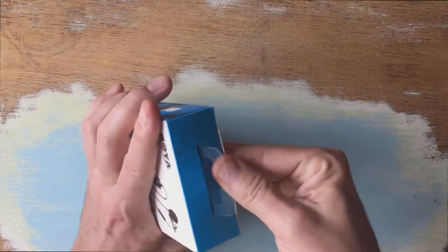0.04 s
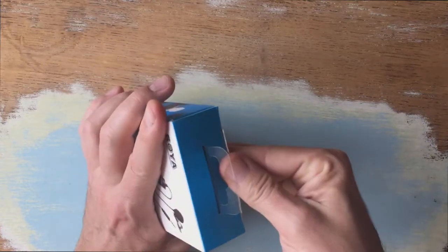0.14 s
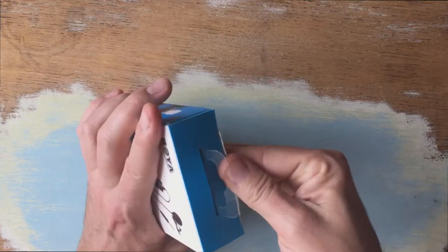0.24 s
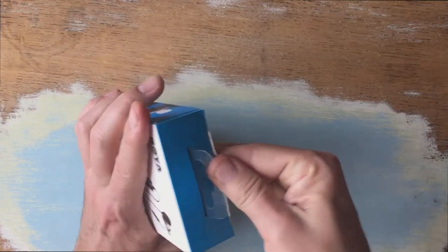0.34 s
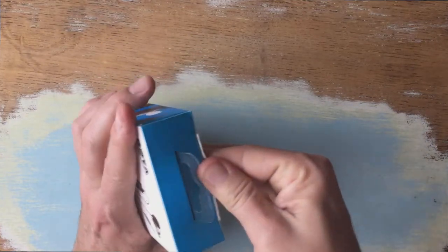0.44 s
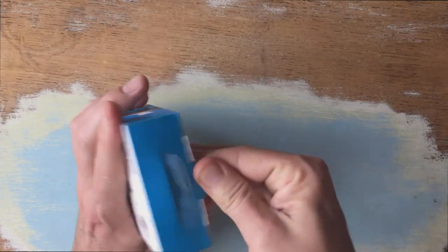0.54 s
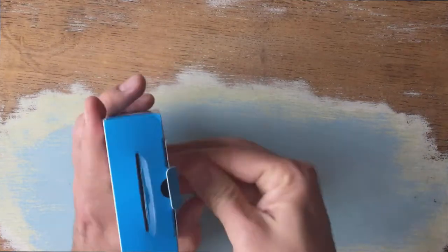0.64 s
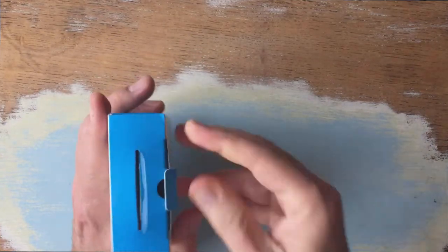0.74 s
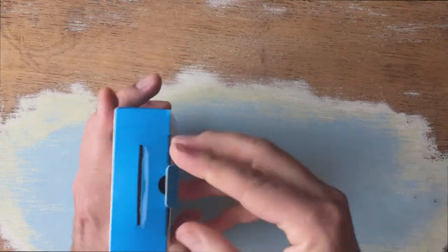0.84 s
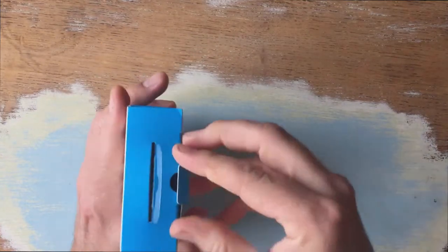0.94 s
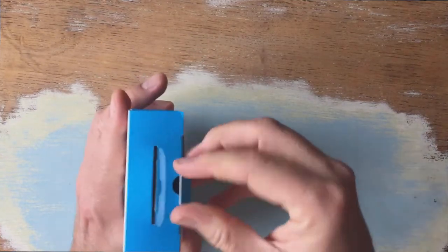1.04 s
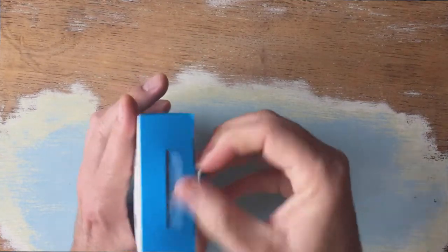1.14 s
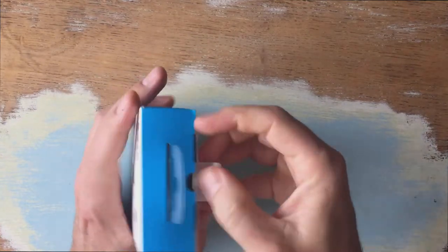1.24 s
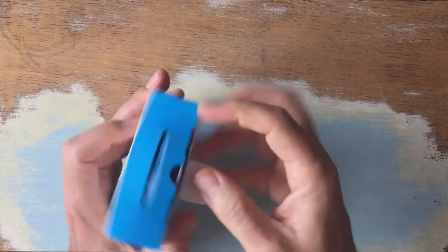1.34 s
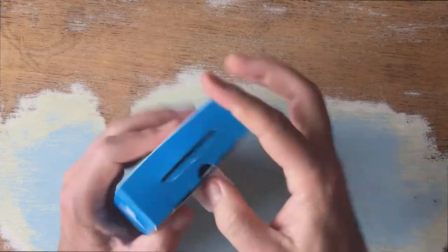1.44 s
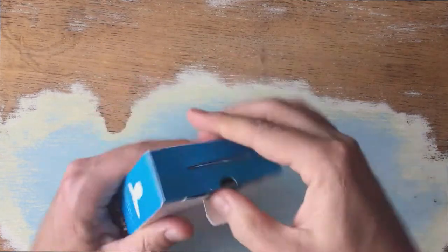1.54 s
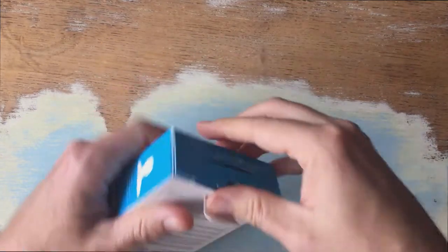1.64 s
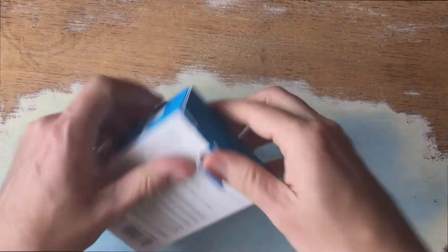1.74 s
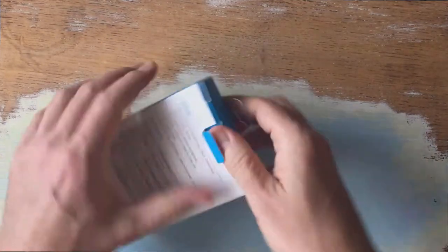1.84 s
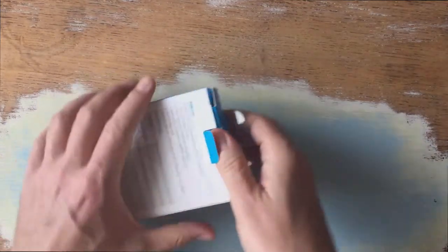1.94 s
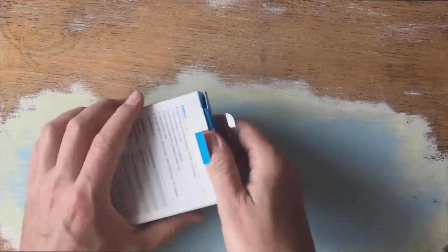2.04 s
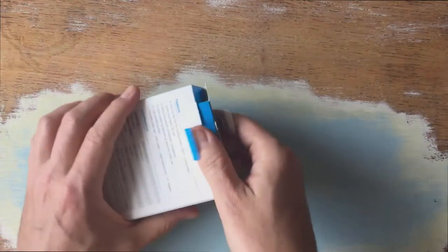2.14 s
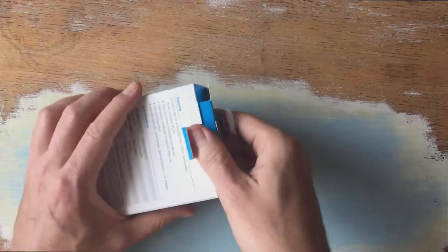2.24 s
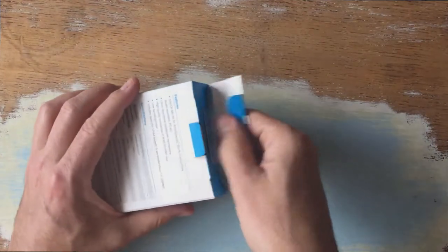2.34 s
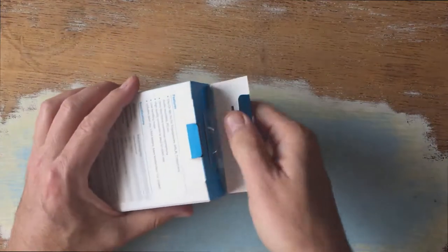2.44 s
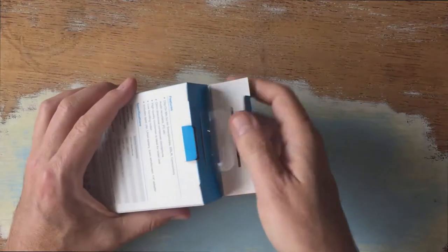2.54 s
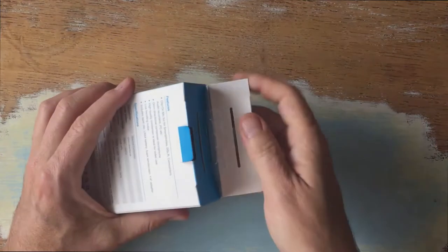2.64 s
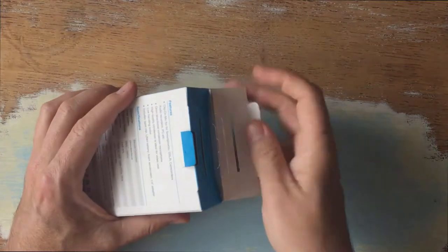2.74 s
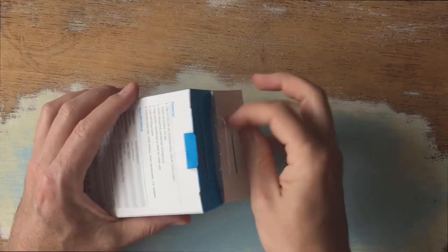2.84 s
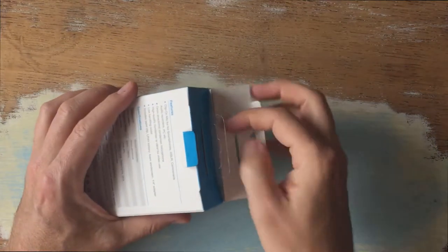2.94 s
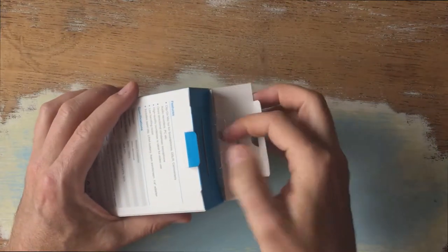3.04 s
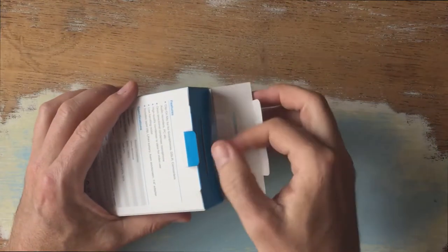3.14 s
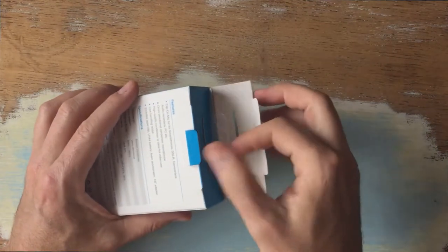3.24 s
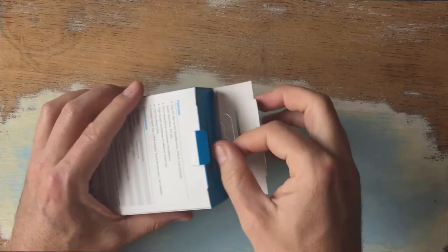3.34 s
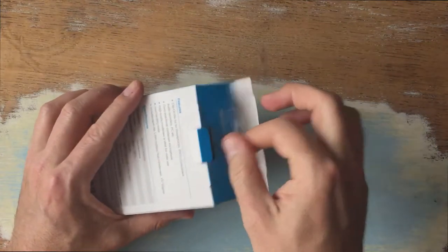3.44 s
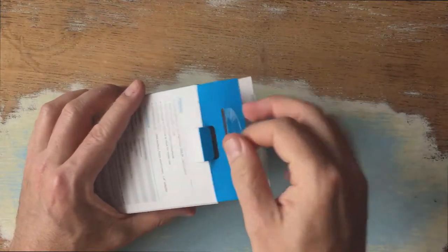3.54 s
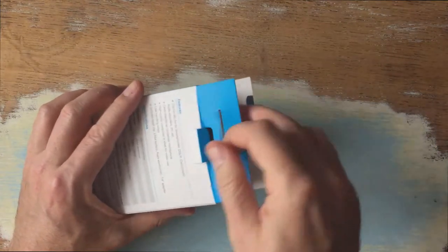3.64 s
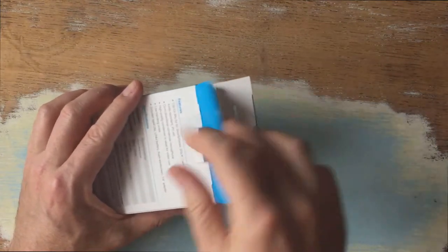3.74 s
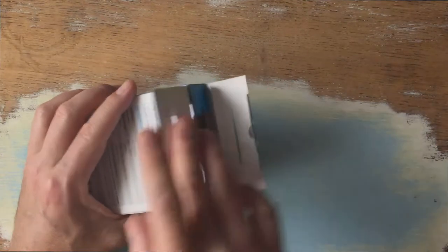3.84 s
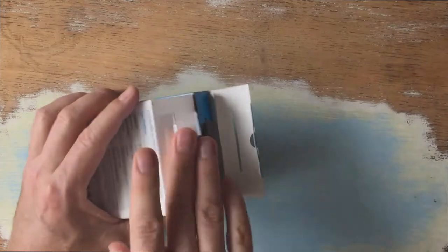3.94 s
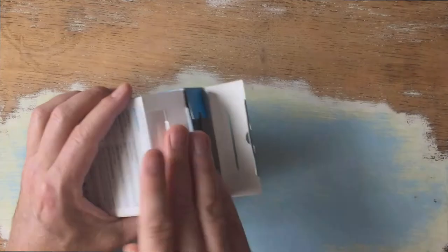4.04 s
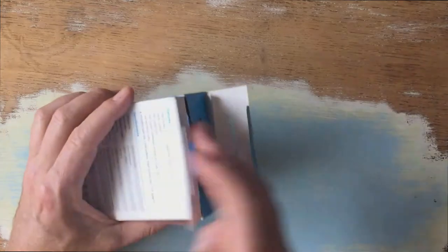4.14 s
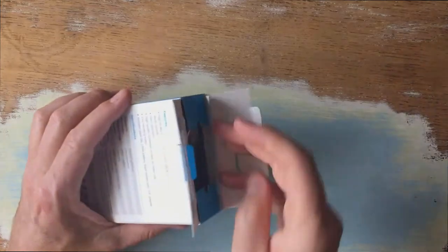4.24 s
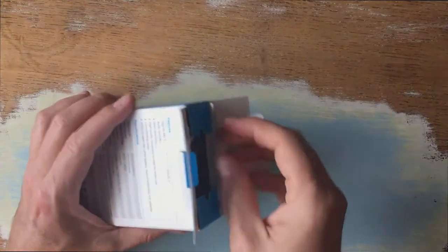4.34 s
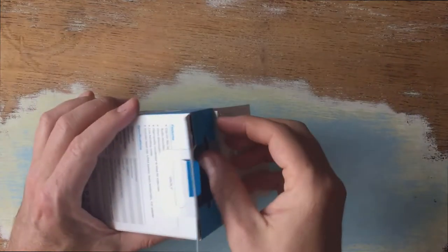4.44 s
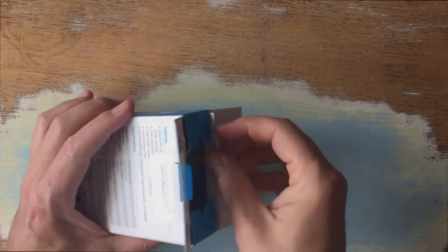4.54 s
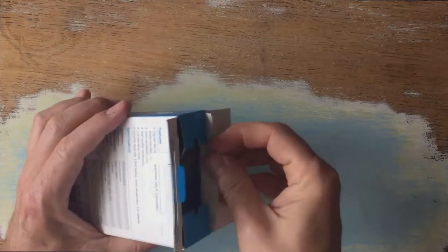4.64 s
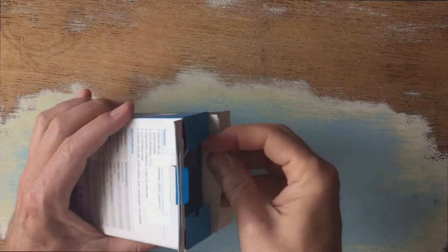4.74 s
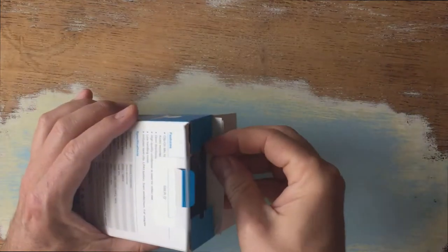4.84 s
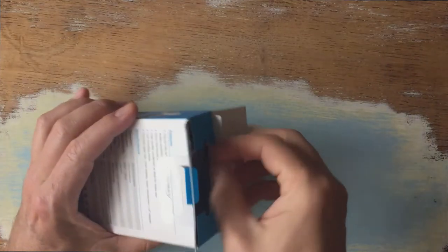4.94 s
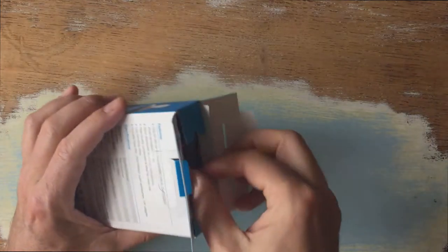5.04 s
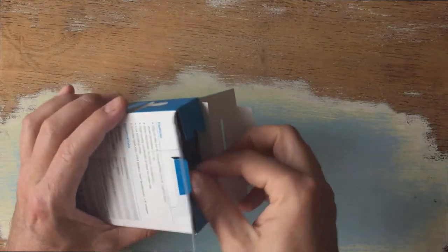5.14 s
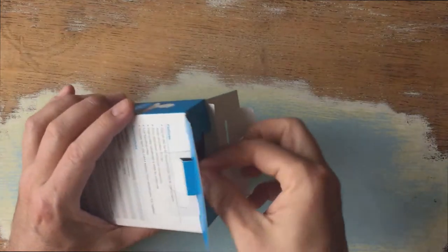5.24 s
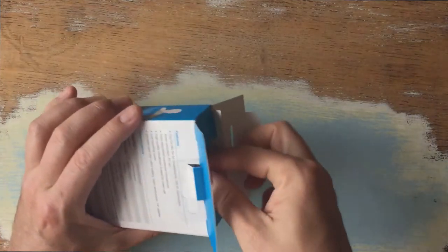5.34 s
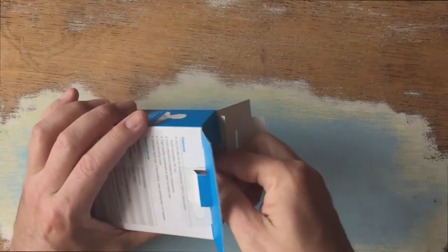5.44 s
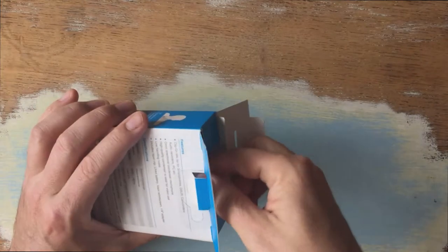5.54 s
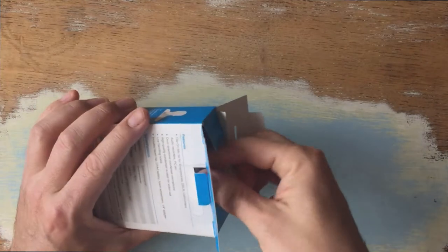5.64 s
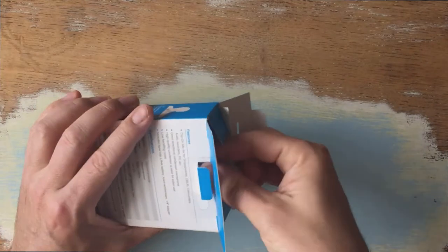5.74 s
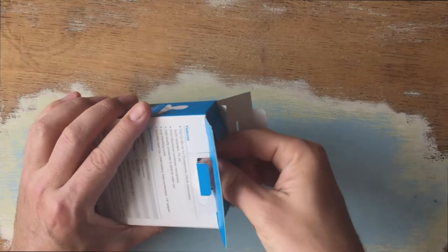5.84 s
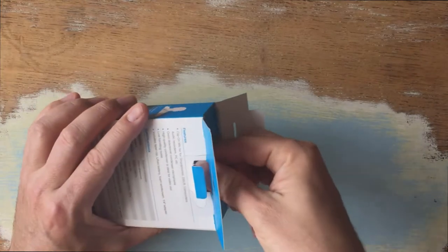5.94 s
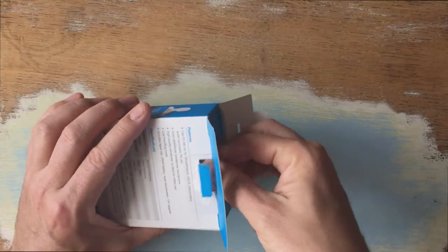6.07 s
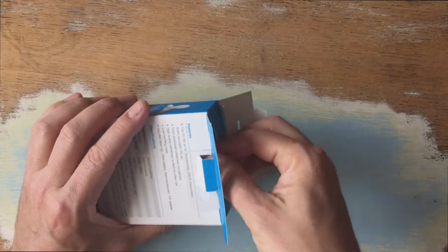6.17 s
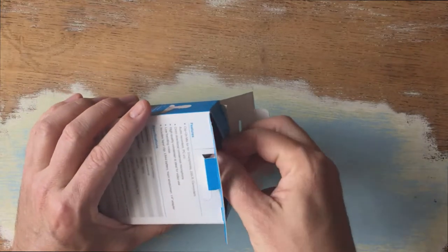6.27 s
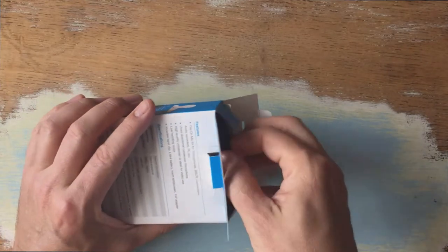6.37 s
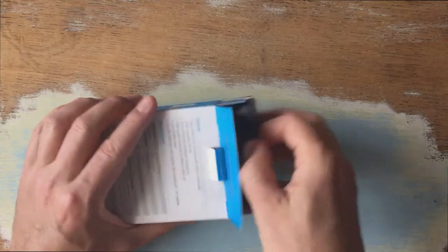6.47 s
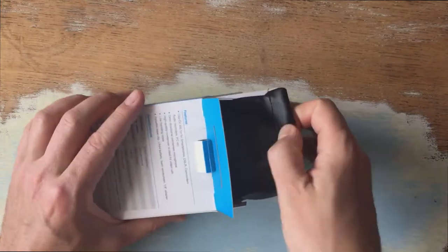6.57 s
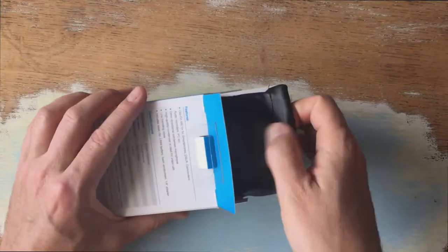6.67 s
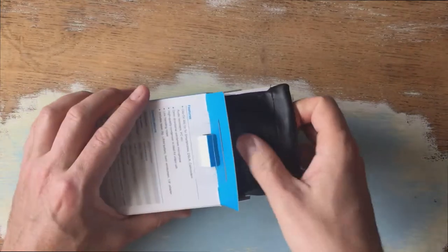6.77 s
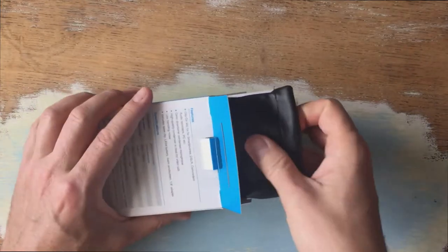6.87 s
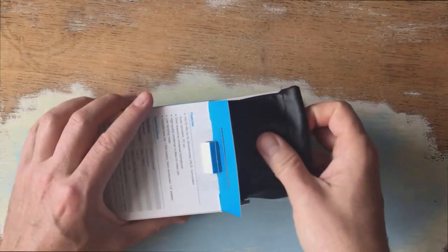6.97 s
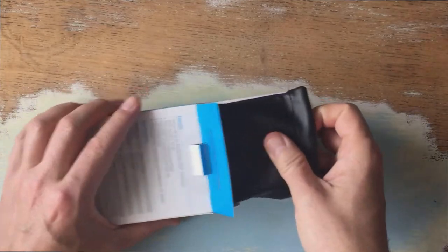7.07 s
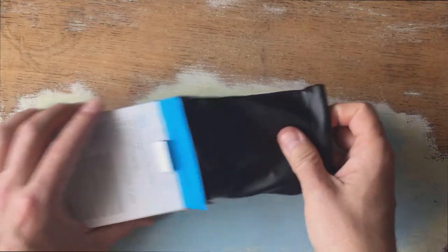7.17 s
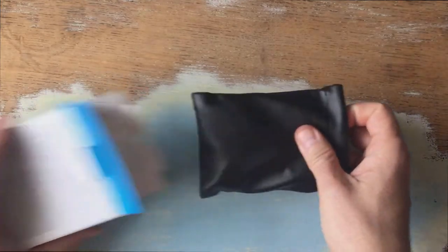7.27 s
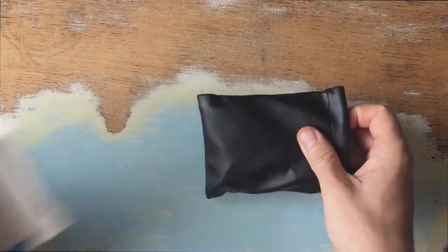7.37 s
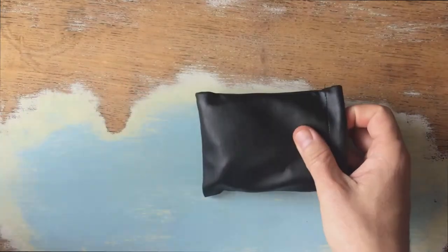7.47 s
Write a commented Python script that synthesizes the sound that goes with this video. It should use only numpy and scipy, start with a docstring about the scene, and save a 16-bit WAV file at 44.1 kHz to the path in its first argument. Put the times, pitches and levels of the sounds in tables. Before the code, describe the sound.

A close microphone in a quiet, barely reverberant room, with faint low hum and soft air tone. At 0 s hands lightly rub a small cardboard box while a low table ring fades; small ticks follow. At 0.68 s a bright, sharp snap with a hollow tap stands out, then near quiet. Around 1.36 s crisp clicks lead to a heavy, low wooden thud at 1.5 s, quickly muted, with further bumps and a brief ring to 1.85 s. From 2.0 to 2.7 s come boxy knocks, a short creak and dense flap snaps and scrapes. Lighter clicks continue until the loudest crack at 3.57 s, then scuffs and taps to 4.3 s. Quieter papery fiddling runs to 6.4 s, busier with ticks and little creaks near 5.5-5.8 s. At 6.5 s a hollow bump and long dry drag begin the pouch's removal; sliding and clustered taps at 7.2-7.4 s end it.

```python
"""In a quiet room, over faint hum and room tone, hands rub a small cardboard box; a panel sings and the low
ring of a table knock fades. Noise bursts snap from card edges; decaying modes thud in the table top and tap in
the hollow box. A sharp snap comes at 0.68 s; a heavy thud at 1.5 s is muted by a grip, then while the box is
lifted the table rings on until it lands. Noise slides join from 2 s as flaps and pouch drag over card; the
loudest snap comes near 3.6 s, quieter handling follows, and stronger taps and long drags of the pouch close the
scene."""
import sys
import numpy as np
from scipy import signal
from scipy.fft import rfft, irfft, next_fast_len
from scipy.io import wavfile

SR = 44100
rng = np.random.default_rng(int(sys.argv[2]) if len(sys.argv) > 2 else 0)


def gain_from_decibels(decibels):
    """Convert decibel values to linear amplitude factors."""
    exponent = np.asarray(decibels, float) / 20
    return 10 ** exponent


def transcribe(signal):
    """Save signal, clipped to [-1, 1], as a 16-bit WAV file at the path in sys.argv[1]."""
    frames = np.atleast_2d(signal).T
    limited = np.clip(frames, -1, 1)
    pcm = np.round(limited * 32767).astype(np.int16)
    wavfile.write(sys.argv[1], SR, pcm)


N = 331191


def rms_one(x):
    """Normalisation: scales a signal to unit rms."""
    return x / np.sqrt(np.mean(x ** 2) + 1e-20)


def cut(x, hz, kind, order=2):
    """Maximally flat filtering: a Butterworth filter."""
    return signal.sosfilt(signal.butter(order, hz, kind, fs=SR, output="sos"), x)


def resonance(x, hz, width_hz):
    """Damped oscillator: a two-pole peak with gain near 1 on top."""
    r = np.exp(-np.pi * width_hz / SR)
    feedback = [1, -2 * r * np.cos(2 * np.pi * hz / SR), r * r]
    return signal.lfilter(np.array([1, 0, -1]) * (1 - r * r) / 2, feedback, x)


def coloured(x, spectrum):
    """Spectral shaping: weights the Fourier components of white noise."""
    hz, level_db = np.transpose(spectrum)
    size = next_fast_len(len(x))
    grid = np.maximum(np.fft.rfftfreq(size, 1 / SR), 1)
    gain = gain_from_decibels(np.interp(np.log(grid), np.log(hz), level_db))
    return irfft(rfft(x, size) * gain, size)[:len(x)]


def drift(rate_hz):
    """Low-pass random modulation: unit-rms noise below rate_hz, drawn at every 20th sample."""
    slow = cut(rng.standard_normal(N // 20 + 3002), 20 * rate_hz, "low")[3000:]
    return np.interp(np.arange(N) / 20, np.arange(len(slow)), rms_one(slow))


def add(out, s, sound):
    """Superposition: mixes a short sound in at time s."""
    i = int(s * SR)
    out[i:i + len(sound)] += sound[:N - i]


# early rough hum: time_s, level_db (rms)
EARLY_HUM = [(0, -54.5), (.6, -71), (1.35, -66), (1.6, -81.5)]
# deep rumble that comes and goes: time_s, level_db (rms)
RUMBLE_LEVEL = [(0.0, -79), (1.21, -81), (1.59, -78), (1.88, -76), (3.86, -71.5), (3.93, -80.5),
                (6.77, -76), (6.89, -67), (7.5, -82.5)]


def hum():
    """Narrow-band noise: an early rough hum, a steady lower one and a deep wavering rumble."""
    def level(rows):
        return gain_from_decibels(np.interp(np.arange(N) / SR, *np.transpose(rows)))
    early = level(EARLY_HUM) * rms_one(resonance(rng.standard_normal(N), 200.0, 30.))
    deep = level(RUMBLE_LEVEL) * rms_one(cut(rng.standard_normal(N), [38., 75.], "band"))
    steady = gain_from_decibels(-82.0) * rms_one(resonance(rng.standard_normal(N), 95., 35.))
    return early + deep + steady


# spectrum of the room tone: pitch_hz, level_db (relative)
AIR_SPECTRUM = [(45, -8), (75, 8.5), (108, 16.5), (229, 12.5), (373, -5), (641, 0), (840, -25), (1290, -19),
                (4500, -7), (9070, -6.5), (13600, -37.5), (16000, -60)]


def room_tone():
    """Stationary coloured noise: the steady air of the room."""
    air_db = -71
    return gain_from_decibels(air_db) * rms_one(coloured(rng.standard_normal(N), AIR_SPECTRUM))


def crackle():
    """Impulse excitation: random fibre cracks ring a few cycles, each pitch in patches of its own."""
    cracks_per_s = 420   # before clumping
    born = rng.random(N) < cracks_per_s * gain_from_decibels(3.0 * drift(12)) / SR
    sizes = gain_from_decibels(4 * np.minimum(rng.exponential(1, N), 3)) * rng.choice([-1, 1], N) * born
    pitches_hz, dealt = np.geomspace(550.0, 3200.0, num=9), rng.integers(0, 9, N)
    rings = np.zeros(N)
    for k, hz in enumerate(pitches_hz):
        cracks = gain_from_decibels(4 * drift(12)) * sizes * (dealt == k) + 1e-18
        rings += rms_one(resonance(cracks, hz, 0.08 * hz))
    return rms_one(cut(rings, 2600.0, "low"))


# walls and air of the box: pitch_hz, level_db (relative), t60_s (before the ring factors)
BOX_MODES = [(501, 10.5, 0.065), (600, 16.5, 0.064), (660, 9, 0.14), (750, 6, 0.13), (847.6, 12, 0.089),
             (910, 3, 0.22), (1001, 7.5, 0.14), (1140, -4.5, 0.38), (1210, 13, 0.093), (1310, 10.5, 0.1),
             (1460, 12, 0.19), (1600, 7, 0.18)]
# modes of the table top: pitch_hz, level_db (relative), t60_s (before the ring factors)
TABLE_MODES = [(72, -13, 0.12), (102, -11, 0.24), (147.7, 4, 0.34), (201.6, -14, 0.16), (229.3, -2, 0.14),
               (258.1, -2.5, 0.14), (279.8, -2.5, 0.083), (322, -7.5, 0.097), (438.8, -12.5, 0.14)]
# colour of skin rubbing card: pitch_hz, level_db (per Hz, relative)
HISS_SPECTRUM = [(710, 5.5), (1200, -18), (1750, 0.5), (2060, 20), (2270, 5), (4600, -19.5), (6160, -26.5),
                 (11600, -29.5), (16000, -36)]
# hands at work: time_s, slide_db (skin on card), shift_db (box on table), both before layer offsets
RUB_LEVEL = [(0.0, -60, -44), (0.33, -66, -76), (0.45, -66, -64), (0.6, -74, -72), (1.051, -71, -84),
             (1.291, -55, -78), (1.458, -57.5, -59), (1.659, -54.5, -52), (1.81, -72, -73),
             (1.954, -62.5, -47.5), (2.38, -54, -58), (2.82, -75.5, -82), (3.16, -66.5, -64.5),
             (3.37, -69.5, -63), (3.47, -49.5, -67), (3.79, -56, -64), (4.05, -51, -65.5),
             (4.115, -63, -63), (4.251, -58, -66.5), (4.349, -68, -67), (4.87, -66, -73),
             (5.63, -60, -60.5), (5.98, -63.5, -62.5), (6.459, -51.5, -63.5), (6.759, -64.5, -74),
             (7.26, -48.5, -74), (7.51, -71.5, -64)]

SPLIT_HZ = 6000   # between body and treble of the card sounds


def rubbing():
    """Stick-slip friction: clumped grains of uneven size that also keep box and table humming."""
    hiss_db, box_hum_db, table_hum_db, crackle_db = -18, -11.5, -2.5, -6.5   # layers against control
    treble_offset_db, treble_follows = -10, 0.46   # treble moves by this share of the slide level
    s, *controls = np.transpose(RUB_LEVEL)
    slide_db, shift_db = [np.interp(np.arange(N) / SR, s, c) for c in controls]
    mean_db = slide_db.mean()
    treble_db = treble_offset_db + mean_db + treble_follows * (slide_db - mean_db)

    sizes = gain_from_decibels(0.98 * np.minimum(rng.exponential(1, N), 5)) * rng.standard_normal(N)
    sparse = sizes * (rng.random(N) < 9000 / SR)   # 9000 grains per second
    grains = sparse + 1.9 * rng.standard_normal(N)
    clumps = gain_from_decibels(3 * drift(14) + 2 * drift(70))
    flutter_db = 3.5 * drift(20)

    hiss = coloured(grains, HISS_SPECTRUM)
    mid = rms_one(cut(hiss, SPLIT_HZ, "low", order=4))
    top = rms_one(cut(hiss, SPLIT_HZ, "high", order=4))
    box = rms_one(sum(gain_from_decibels(db) * resonance(grains, hz, 64.0) for hz, db, t60 in BOX_MODES))
    table = rms_one(sum(gain_from_decibels(db) * resonance(grains, hz, 37.0) for hz, db, t60 in TABLE_MODES))

    surface = gain_from_decibels(hiss_db) * mid + gain_from_decibels(box_hum_db + flutter_db) * box + gain_from_decibels(crackle_db) * crackle()
    sliding = clumps * gain_from_decibels(slide_db) * surface
    treble = np.sqrt(clumps) * gain_from_decibels(treble_db) * top   # clumps less than the body
    return sliding + treble + gain_from_decibels(shift_db + table_hum_db) * table


# singing box walls; the low opening row is the fading ring of a table knock:
# start_s, end_s, level_db (at the start), first_hz, last_hz
CREAK_EVENTS = [(0.0, 0.229, -57.5, 1572, 1600), (0.0, 0.132, -52.5, 248, 269),
                (1.24, 1.345, -57, 1500, 1500), (1.619, 1.685, -50, 750, 726),
                (1.612, 1.68, -50, 1023, 993), (1.995, 2.085, -59, 1620, 1600),
                (2.106, 2.143, -39, 875, 835), (2.516, 2.615, -53.5, 785, 832),
                (2.78, 2.81, -62, 3650, 3640), (2.873, 2.93, -59.5, 3470, 3480),
                (2.875, 2.931, -64, 1244, 1280), (3.021, 3.055, -51.5, 1288, 1250),
                (4.94, 4.966, -56.5, 1680, 1723), (5.04, 5.062, -60, 517, 520),
                (5.42, 5.476, -57, 646, 660), (4.13, 4.174, -48.5, 760, 750), (4.202, 4.303, -52, 700, 587),
                (5.616, 5.658, -49, 660, 606), (5.68, 5.734, -46.5, 548, 652),
                (5.675, 5.72, -50.5, 1205, 1190), (5.73, 5.772, -42, 1600, 1750),
                (5.726, 5.788, -45.5, 2325, 2466), (5.859, 5.885, -50, 1490, 1450),
                (7.12, 7.24, -58, 683, 636), (7.272, 7.33, -45, 660, 705), (7.365, 7.439, -50.5, 880, 880),
                (7.37, 7.407, -47, 2860, 2820)]


def creaks():
    """Narrow-band excitation: uneven slips feed one band of gliding pitch; a pressed wall bends its pitch."""
    width_share, fade_db, slips_per_s = 0.064, -7, 900   # half width as a share of pitch; fade to the end
    out, lead = np.zeros(N), 500   # samples for the filter to settle
    for start_s, end_s, level_db, first_hz, last_hz in CREAK_EVENTS:
        along = np.linspace(0, 1, int((end_s - start_s) * SR))
        count = len(along) + lead
        slips = rng.standard_normal((2, count)) * (.05 + (rng.random(count) < slips_per_s / SR))
        swing = cut(slips, width_share * first_hz, "low")[:, lead:]
        phase = 2 * np.pi * np.cumsum(first_hz + (last_hz - first_hz) * along) / SR
        tone = rms_one(swing[0] * np.sin(phase) + swing[1] * np.cos(phase))
        edges = np.clip(np.minimum(along, 1 - along) * 8, 0, 1)
        add(out, start_s, gain_from_decibels(level_db + fade_db * along) * edges * tone)
    return out


def card(noise, strongest_hz, width_hz, treble_db):
    """Source-filter principle: slip noise through a broad peak, panel rings and treble near 9 kHz."""
    body = resonance(noise[0], strongest_hz, width_hz) + 0.096 * cut(noise[0], [1500, SPLIT_HZ], "band")
    octaves = rng.normal(.2, .6, 3)
    rings_hz = np.clip(strongest_hz * 2 ** octaves, 900, 9000)
    body += 0.3 * sum(resonance(noise[0], hz, 0.05 * hz) for hz in rings_hz)

    fizz = gain_from_decibels(rng.normal(-11, 3)) * cut(noise[1], [10500, 15000], "band")
    treble = resonance(noise[1], 8800., 2100.0) + fizz
    treble_rings_hz = SPLIT_HZ * 2 ** rng.uniform(0, 1.2, 2)
    treble += .9 * sum(resonance(noise[1], hz, .03 * hz) for hz in treble_rings_hz)
    return rms_one(body) + gain_from_decibels(treble_db) * rms_one(cut(treble, 2800.0, "high"))


# tabs, flap edges and nails slipping: peak_s, level_db, length_ms (between the -8 dB points of the burst),
# strongest_hz, treble_db (against the body)
SNAP_EVENTS = [(0.094, -53, 2.2, 1480, -34), (0.229, -63, 4, 1500, -32), (1.013, -55, 0.9, 2490, -23),
               (1.196, -56, 1.2, 2520, -18), (1.3571, -30, 3, 4160, -4.5), (0.1765, -57, 3.6, 1550, -24),
               (0.391, -48, 2.1, 1390, -23.5), (0.6761, -14, 1.55, 4550, -12),
               (0.679, -15, 2.4, 4800, 16.5), (0.6807, -15, 3.3, 1380, 11), (0.6933, -28.5, 7.8, 1350, -18),
               (0.7600, -51, 12, 1500, -9.5), (1.27, -40.5, 5.5, 2380, -12), (1.3636, -20, 2.5, 3900, -2.5),
               (1.4736, -26, 4.6, 1400, -8), (1.5038, -33.5, 3.2, 2000, -23.5),
               (1.7202, -45, 3.7, 2000, -11), (1.856, -49, 4.5, 1600, -22), (2.1005, -33, 7.2, 1650, -42.5),
               (2.1260, -41.5, 23, 1600, -24), (2.259, -22.5, 4.8, 1400, -13),
               (2.4057, -41, 17, 1420, -15.5), (2.417, -29, 1.7, 3200, -35.5),
               (2.424, -13.5, 1.6, 3890, -6), (2.4289, -19, 1.2, 5470, 12.5),
               (2.4447, -18.5, 4.4, 1320, -17), (2.4713, -26.5, 4.2, 4680, -14),
               (2.484, -29.5, 5, 2340, -30), (2.491, -16, 1.3, 4100, -12.5), (2.5016, -22, 2, 4220, -12.5),
               (2.6805, -27, 2.4, 1940, -4), (2.798, -49, 8, 3540, -21), (2.921, -49, 8, 3600, -24),
               (3.0401, -42.5, 7.4, 3970, -30), (3.1699, -45, 2.4, 1960, -2),
               (3.1872, -30, 1.2, 1620, -2.5), (3.2809, -29.5, 3, 5080, -4), (3.3937, -34, 2.4, 1600, -29),
               (3.407, -37.5, 4, 2300, -5.5), (3.417, -24.5, 3, 1950, -5), (3.557, -31, 4, 2596, 3),
               (3.568, -5.5, 1.2, 2730, 6.5), (3.6572, -43.5, 4, 1580, -25),
               (3.7137, -35.5, 3.2, 1610, -24), (3.7242, -32.5, 2.8, 2400, -2),
               (3.807, -40, 1.5, 1350, -39.5), (3.8524, -23.5, 3.6, 4120, -11),
               (3.9199, -25.5, 1.1, 2440, -42), (3.9766, -33, 1.9, 1530, -9),
               (3.9846, -33.5, 4.6, 2000, -27), (4.159, -32.5, 1.4, 1710, -6),
               (4.2548, -49, 3.6, 2270, -23), (4.2714, -44, 1.5, 2230, -2),
               (4.3806, -41.5, 6.7, 5530, -1.5), (4.5718, -31.5, 1.5, 2300, 1),
               (4.5832, -36.5, 2.4, 4450, -4), (4.7805, -45, 1.4, 6000, 2.5), (4.8193, -44, 3.6, 4330, 1),
               (4.9501, -54, 19, 1820, -10), (5.1086, -40.5, 2.9, 2600, -25),
               (5.1168, -39, 6.7, 1310, -4.5), (5.1974, -52, 4.7, 1840, -19),
               (5.246, -51.5, 2.2, 1600, -24), (5.563, -42, 3.4, 1550, -25), (5.261, -44.5, 6.8, 1620, 2.5),
               (5.3011, -51, 14, 3080, -20), (5.3167, -47, 2.3, 3020, 18.5), (5.479, -43, 3.3, 1536, -9),
               (5.5131, -34, 1.8, 1600, -10), (5.5288, -21.5, 0.73, 1630, -11),
               (5.5803, -38, 1.6, 3140, -28), (5.6321, -36.5, 1.7, 5270, -5),
               (5.6422, -45, 1.4, 5700, -0.5), (5.689, -39.5, 1.7, 2160, -8), (5.7369, -29, 1.1, 1840, -25),
               (5.7433, -39, 3.9, 1700, -12), (5.7668, -32, 1.5, 2300, -16.5),
               (5.8554, -35.5, 0.73, 1650, -10.5), (5.87, -42, 1.4, 1490, -18),
               (6.1339, -51, 10, 5200, -27), (6.1979, -47, 4.4, 1850, -11), (6.2964, -40, 4.2, 1720, -41),
               (6.4939, -47, 5.5, 1635, -14), (6.5477, -24.5, 1.3, 2040, -26),
               (6.5702, -34, 6.6, 1960, -16), (6.581, -36.5, 6.6, 3230, -16.5),
               (6.837, -51.5, 11, 1730, -17), (7.2453, -29.5, 4.3, 2450, -3.5),
               (7.3218, -33.5, 3.5, 1920, -12), (7.3375, -32.5, 2.8, 2530, -26),
               (7.3459, -36, 3.6, 2700, -25), (7.3593, -30.5, 3.8, 2950, -35), (7.368, -38, 3.4, 1940, -37),
               (7.4805, -45, 1.3, 2160, -24), (7.492, -53.5, 9.5, 2070, -27)]


def snaps():
    """Sudden release of strain: a burst of fibre cracks with a faint skirt of noise before and after."""
    rise_share, lead = 0.44, 1300   # share of the length spent building up; samples before the peak
    out, t_ms = np.zeros(N), np.arange(-lead, 2200) * 1000 / SR
    for s, level_db, length_ms, strongest_hz, treble_db in SNAP_EVENTS:
        rise_ms, fall_ms = length_ms * rise_share, length_ms * (1 - rise_share)
        shape = gain_from_decibels(-8 * np.where(t_ms < 0, np.abs(t_ms / rise_ms), np.abs(t_ms / fall_ms) ** 0.98))
        skirt = gain_from_decibels(np.where(t_ms < 0, -33 + 0.49 * t_ms, -24 - 2.0 * t_ms))
        sound = card(rng.standard_normal((2, len(t_ms))), strongest_hz, 310.0, treble_db)
        # the shaped burst gets the energy of its envelope
        sound = sound * np.sqrt(np.sum(shape ** 2) / np.sum((shape * sound) ** 2))
        add(out, s - lead / SR, gain_from_decibels(level_db) * (shape + skirt) * sound)
    return out


def struck(modes, strength_db, build_ms, ring, pressed, held_db, scatter):
    """Modal superposition: modes swell during contact, then a damped and a lingering part decay."""
    hz, level_db, t60 = np.transpose(modes)[:, :, None]
    t60 = t60 * ring
    t = np.arange(int(t60.max() * SR)) / SR
    swell = np.sin(np.pi / 2 * np.minimum(t * 1000 / max(build_ms, .3), 1)) ** 2
    decay = gain_from_decibels(-60 * t / (pressed * t60)) + gain_from_decibels(held_db - 60 * t / t60)
    phase = scatter * rng.uniform(-0.13, 1, hz.shape)
    partials = gain_from_decibels(level_db + strength_db[:, None]) * decay * np.sin(2 * np.pi * hz * t + phase)
    return swell * np.sum(partials, axis=0)


# bumps that reach the table top: start_s, level_db (before the common offset),
# low_db (extra on the lowest modes), build_ms
THUD_EVENTS = [(0.1658, -53, -6, 1.9), (0.619, -60.5, 11, 8.3), (0.6736, -48, -32, 3),
               (0.689, -34, -9.5, 2.2), (1.2563, -54.5, -7, 7.9), (1.359, -58, 3, 1.7),
               (1.5026, -6.5, -11, 5.1), (1.567, -50, -12, 6.7), (1.6053, -22.5, -33, 12.7),
               (1.639, -19.5, -23, 7.7), (1.8515, -24.5, -6.5, 5), (2.011, -33.5, -6, 16),
               (2.0993, -15, -21, 10.8), (2.2514, -38.5, -14, 12), (2.4424, -31.5, -10, 4.1),
               (2.5, -34.5, -17, 16), (2.683, -41.5, 0, 2.2), (2.815, -56, -11, 7.1),
               (3.026, -49, -18.5, 12), (3.184, -40, -3.5, 2.5), (3.293, -49.5, -0.5, 8),
               (3.413, -43, -26, 1.5), (3.531, -61, -31, 3.4), (3.568, -40, -1, 18),
               (3.658, -56.5, 11, 1.1), (3.7274, -42, 3, 1.5), (3.803, -49.5, -11, 2.5),
               (3.8505, -41, -3, 3.2), (3.983, -49, -7, 5.6), (4.03, -42, -5, 9.3), (5.292, -44, -1.5, 6.3),
               (6.2174, -50.5, -23, 6.8), (6.303, -54, -7.5, 6.4), (6.597, -64.5, 19, 20),
               (6.848, -54, -17, 7.3), (7.248, -42.5, -1, 3.3), (7.3385, -43.5, -5, 8.9),
               (7.491, -42, -3, 4.8)]


def thuds():
    """Modal damping: the landing place weights the lowest table modes; a pressing hand shortens them."""
    free_ring, pressed_ring, lifted_ring = 0.5, 0.41, 2.6   # t60 factors of the lowest modes
    pressed_from_s, lifted_s, lands_s = 3.6, (1.62, 1.7), 1.87   # landing stops the lifted ring
    gripped_s, gripped_db = 1.546, -23   # the hand closes on the box and mutes what still rings
    out, lowest = np.zeros(N), np.array(TABLE_MODES)[:, 0] < 170
    for s, level_db, low_db, build_ms in THUD_EVENTS:
        lifted = lifted_s[0] < s < lifted_s[1]
        if lifted:
            low_ring = lifted_ring
        else:
            low_ring = free_ring if s < pressed_from_s else pressed_ring
        ring = np.where(lowest, low_ring, 1)[:, None]
        strength_db = level_db - 6.5 + low_db * lowest + rng.normal(0, 0.83, len(TABLE_MODES))
        sound = struck(TABLE_MODES, strength_db, build_ms, ring, pressed=0.94, held_db=6.5, scatter=0.9)
        now_s = s + np.arange(len(sound)) / SR
        if lifted:
            sound = sound * np.clip((lands_s - now_s) / .04, 0, 1)
        if s < gripped_s:
            sound = sound * gain_from_decibels(gripped_db * np.clip((now_s - gripped_s) / .01, 0, 1))
        add(out, s, sound)
    return out


# knocks that ring the hollow box: start_s, level_db, strongest_hz, build_ms (at least 0.3 is played)
TAP_EVENTS = [(0.172, -43.5, 507, 1.5), (0.176, -55.5, 1210, 0.23), (0.6746, -21.5, 726, 1.74),
              (0.7191, -37, 750.0, 7.4), (0.7568, -43.5, 644, 3.9), (0.8255, -57.5, 660.0, 1),
              (1.2617, -49, 1504, 5.1), (1.3635, -36.5, 600, 1.4), (1.473, -54, 1460, 1.2),
              (1.5035, -41, 600, 0.45), (1.852, -40.5, 640, 1.5), (2.0992, -21.5, 934, 0.33),
              (2.1224, -21.5, 780, 3.7), (2.259, -45, 1180, 3.2), (2.279, -43.5, 517, 1.5),
              (2.37, -39, 504, 3.3), (2.4235, -25, 713, 3.9), (2.4422, -29, 600.0, 2.5),
              (2.472, -36, 1130, 3), (2.485, -24, 1310, 14), (2.492, -20, 780, 2.8), (2.683, -41, 637, 1.3),
              (2.6944, -31, 610, 4.7), (2.795, -43.5, 1080, 3.6), (2.9165, -46, 1237, 2.4),
              (3.031, -58, 1310.0, 4.8), (3.038, -49, 624, 4.4), (3.0987, -51.5, 990, 1.6),
              (3.1775, -39, 660, 2.2), (3.2752, -33.5, 517, 3.2), (3.3926, -45, 750, 2),
              (3.4168, -39, 620, 2.6), (3.536, -34, 493, 2.6), (3.571, -28, 564, 2.65),
              (3.725, -44.5, 564, 0.73), (3.803, -44, 746, 2.5), (3.8474, -33, 1080, 2.7),
              (3.856, -25, 530, 4.2), (3.9194, -38.5, 1360, 0.42), (3.976, -23, 490, 8.8),
              (4.159, -72, 750, 1.3), (4.3802, -39, 617, 8), (4.5876, -49, 970, 2.7),
              (4.8076, -49, 1033, 1), (4.88, -54.5, 570, 4.7), (4.992, -57, 1200, 2.3),
              (5.0448, -44, 1205, 16), (5.255, -46.5, 1170, 4.4), (5.297, -49.5, 613, 2.8),
              (5.3213, -45, 750, 2.3), (5.4726, -27.5, 500, 11), (5.5129, -35.5, 736, 3.4),
              (5.5271, -51, 1460, 0.74), (5.7432, -69, 1560, 1.3), (5.8601, -41.5, 1410, 1.8),
              (6.2935, -36, 661, 4.2), (6.4923, -41.5, 720, 2.3), (6.5372, -18, 590, 20),
              (6.5454, -31, 637, 7.4), (6.6276, -25, 660, 7.7), (6.8416, -45, 880, 1.9),
              (6.8512, -34, 840, 14), (6.9657, -41, 1050, 3.4), (7.0138, -45, 510, 2.5),
              (7.2472, -29, 767, 1.5), (7.2868, -39, 660.0, 4.4), (7.3132, -33, 875, 2),
              (7.3375, -27, 850, 2.5), (7.347, -25.5, 860, 2.7), (7.358, -19.5, 840, 2.6),
              (7.3673, -29.5, 855, 2.3), (7.464, -38, 760, 6.4), (7.491, -48.5, 805, 3.5)]


def taps():
    """Selective modal excitation: a knock favours the box modes near its own pitch."""
    out, hz = np.zeros(N), np.array(BOX_MODES)[:, 0]
    for s, level_db, strongest_hz, build_ms in TAP_EVENTS:
        off_db = -np.minimum(30 * np.abs(np.log2(hz / strongest_hz)), 20.5)   # 30 dB per octave
        strength_db = level_db + off_db + rng.normal(0, 1.5, len(BOX_MODES))
        sound = struck(BOX_MODES, strength_db, build_ms, ring=0.6, pressed=0.3, held_db=-21.5, scatter=1.52)
        add(out, s, sound)
    return out


def drag(count, strongest_hz, treble_db):
    """Granular friction: clumped grains of uneven size on card, with the box humming along."""
    fast = rms_one(cut(rng.standard_normal(count), 150, "low"))
    slow = rms_one(cut(rng.standard_normal(count), 35, "low"))
    clumps = gain_from_decibels(1.8 * fast + 2.5 * slow)
    large = gain_from_decibels(3 * np.minimum(rng.exponential(1, count), 4))
    sizes = .7 + large * (rng.random(count) < 2500 / SR)   # 2500 large grains per second
    grains = clumps * sizes * rng.standard_normal((2, count))
    box = sum(gain_from_decibels(db + rng.normal(0, 8)) * resonance(grains[0], hz, 60.0) for hz, db, t60 in BOX_MODES)
    return card(grains, strongest_hz, 0.18 * strongest_hz, treble_db) + gain_from_decibels(-2.5) * rms_one(box)


# short drags of skin, flaps and pouch over card: peak_s, level_db, length_ms (between the -6 dB points),
# strongest_hz, treble_db (against the body)
SCUFF_EVENTS = [(0.686, -29, 18, 6700, -18), (0.715, -49, 38, 4900, -2), (0.76, -55.5, 46, 5810, -16),
                (0.825, -61.5, 22, 3930, 4), (1.035, -61.5, 47, 4100, -29.5), (1.138, -62, 41, 5400, 4.5),
                (1.31, -53.5, 72, 5270, -25), (1.365, -35, 24.3, 5700, -15), (1.475, -46, 47, 1600, -2),
                (1.53, -47.5, 47, 915, -23), (1.585, -61, 37, 1210, -6), (1.645, -65, 250, 1020, 4.5),
                (1.72, -55.5, 44, 2400, -13), (1.777, -59.5, 19.4, 1600, -5), (2.109, -48.5, 52, 1210, -35),
                (2.149, -66.5, 27, 1260, -27), (2.264, -41, 35, 1290, -3), (2.448, -33.5, 48, 3430, -8),
                (2.54, -53, 43, 1040, -8), (2.69, -45.5, 46, 1900, -13.5), (2.904, -65, 41, 4550, -23),
                (3.033, -55, 40, 4060, -20), (3.185, -45.5, 22.4, 1960, -8), (3.237, -55.5, 21, 6050, -6),
                (3.285, -45.5, 53, 4070, -15), (3.422, -46.5, 33, 2020, -9), (3.518, -41, 47, 2830, -10.5),
                (3.565, -32, 47, 3017, 2), (3.72, -58, 12, 2350, -10), (3.855, -43.5, 44.3, 3670, -6),
                (3.927, -45, 17, 2500, -21), (3.992, -42, 29, 1570, -13), (4.033, -50, 47, 2450, -33),
                (4.193, -54.5, 65, 2700, 5), (4.278, -58, 19, 2300, -17), (4.395, -65, 98, 6650, -13),
                (4.581, -46.5, 27, 2090, 1), (4.811, -49.5, 21, 4500, -6), (4.884, -54, 18, 4500, -13),
                (5.049, -64.5, 70, 1310, -18), (5.272, -52.5, 23, 1380, 0),
                (5.315, -50.5, 24.5, 1320, -0.5), (5.533, -53, 76, 1620, -7),
                (5.585, -53.5, 150, 5760, -13), (5.699, -50.5, 29, 2600, -12), (5.75, -43, 29, 3800, -6),
                (5.866, -46.5, 22, 2280, -14), (6.198, -55.5, 74, 1905, -7), (6.299, -52, 34, 1960, -24),
                (6.419, -48.5, 19.5, 2170, -32), (6.55, -45, 92, 1960, -20), (6.629, -47.5, 77, 3600, 0),
                (6.848, -51, 30, 4030, -22), (7.06, -59.5, 89, 2250, -6), (7.19, -53, 73, 2970, 3),
                (7.262, -41.5, 19, 1310, -5), (7.375, -54, 25, 2720, -33)]


def scuffs():
    """Stick and release: short drags swell and fade; a caught one bursts out with the snap that frees it."""
    rise_share, lead = 0.54, 3000   # share of the length spent swelling; samples before the peak
    caught_db = -9   # extra level until a louder snap frees the drag
    out, t_ms = np.zeros(N), np.arange(-lead, 4500) * 1000 / SR
    snap_s, snap_db = np.array(SNAP_EVENTS)[:, :2].T
    for s, level_db, length_ms, strongest_hz, treble_db in SCUFF_EVENTS:
        rise_ms, fall_ms = length_ms * rise_share, length_ms * (1 - rise_share)
        shape_db = -6 * np.where(t_ms < 0, np.abs(t_ms / rise_ms) ** 2.0, np.abs(t_ms / fall_ms) ** 1.6)
        snap_ms = (snap_s - s) * 1000
        freed_ms = snap_ms[(snap_ms > -2 * rise_ms) & (snap_ms < -2) & (snap_db > level_db)]
        if len(freed_ms):
            shape_db = shape_db + caught_db * (t_ms < freed_ms.min() - 1)
        add(out, s - lead / SR, gain_from_decibels(level_db + shape_db) * drag(len(t_ms), strongest_hz, treble_db))
    return out


# long even slides of fingers, flap and pouch: start_s, end_s, level_db, strongest_hz,
# treble_db (against the body)
SLIDE_EVENTS = [(1.952, 2.1, -73, 1470, 3), (2.205, 2.245, -58, 1390, -20), (4.043, 4.1, -58.5, 2370, -32),
                (2.28, 2.422, -62, 1330, -30.5), (4.16, 4.221, -54, 2280, -26),
                (4.242, 4.285, -60.5, 2300, -23), (5.038, 5.133, -57, 6500, -22),
                (5.394, 5.469, -60.5, 1980, -8), (6.494, 6.694, -48, 2450, -3.5),
                (7.19, 7.33, -52, 2570, -1)]


def slides():
    """Steady friction: long drags start, hold their level and stop."""
    edge_ms, lead = 8, 1000   # time to start or stop; samples before the start
    out, t_ms = np.zeros(N), np.arange(-lead, 12000) * 1000 / SR
    for start_s, end_s, level_db, strongest_hz, treble_db in SLIDE_EVENTS:
        to_edge_ms = np.minimum(t_ms, (end_s - start_s) * 1000 - t_ms)
        shape = np.clip(to_edge_ms / edge_ms + 1, 0, 1) ** 2
        add(out, start_s - lead / SR, gain_from_decibels(level_db) * shape * drag(len(t_ms), strongest_hz, treble_db))
    return out


def room(x):
    """Diffuse reverberation: echoes as noise that dies away, dulled by the walls."""
    t60_s, wall_cut_hz = 0.14, 1600
    t = np.arange(int(.4 * SR)) / SR
    echoes = rng.standard_normal(len(t)) * gain_from_decibels(-60 * t / t60_s) * (t > .004)
    echoes = cut(echoes, wall_cut_hz, "low", order=1)
    return signal.fftconvolve(x, echoes / np.sqrt(np.sum(echoes ** 2)))[:N]


def scene():
    """Direct and diffuse sound near one microphone; small sources radiate little deep bass."""
    handling = rubbing() + creaks() + snaps() + thuds() + taps() + scuffs() + slides()
    near = cut(handling, 69.0, "high", order=3)
    room_db = -16
    return (near + gain_from_decibels(room_db) * room(near) + room_tone() + hum())[None]


def roll_off(x):
    """The treble ends steeply here."""
    return signal.sosfilt(signal.butter(12, 16800, fs=SR, output="sos"), x)


def record(dry):
    """Soft saturation and band limiting: peaks are rounded and the top is cut."""
    rounded = 0.93 * np.tanh(dry / 1.02)
    mix = cut(rounded, 16300, "low", order=12)
    return roll_off(mix)


dry = scene()
out = record(dry)
transcribe(out)
```